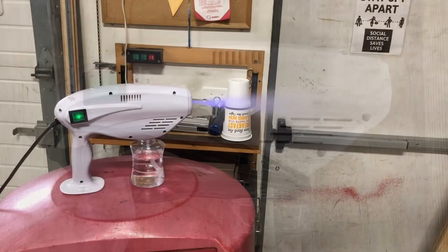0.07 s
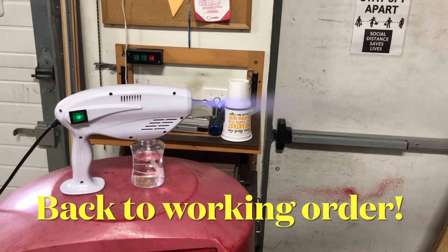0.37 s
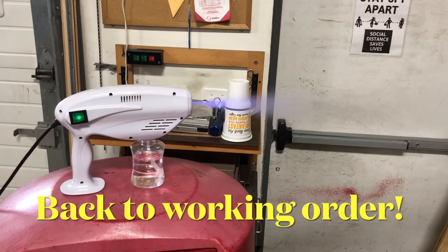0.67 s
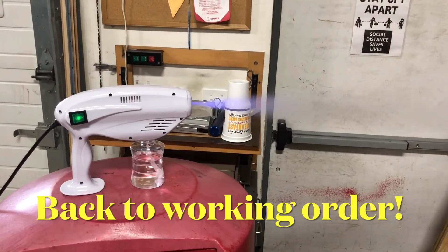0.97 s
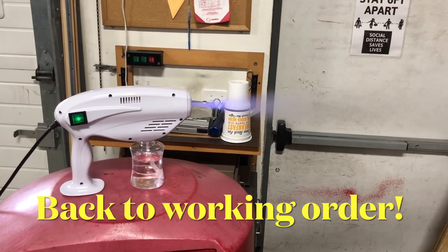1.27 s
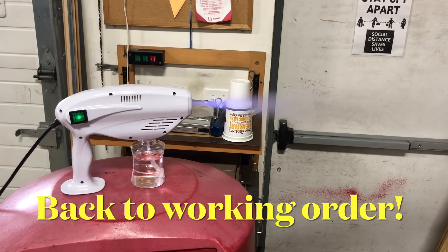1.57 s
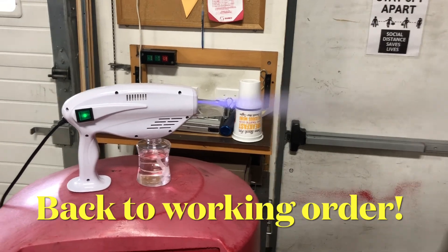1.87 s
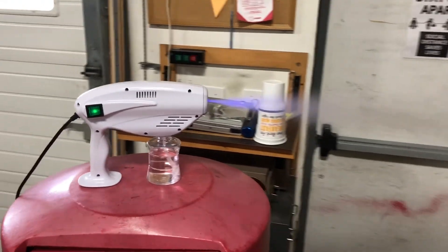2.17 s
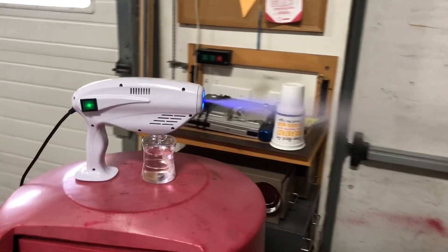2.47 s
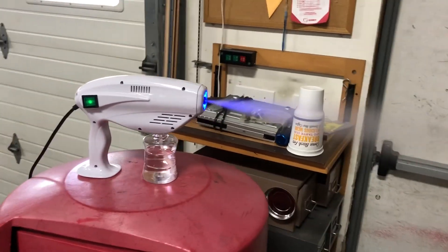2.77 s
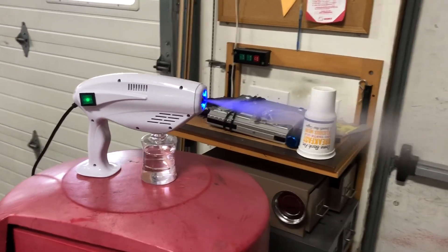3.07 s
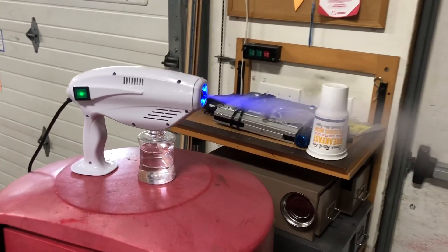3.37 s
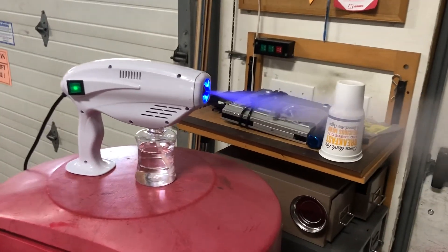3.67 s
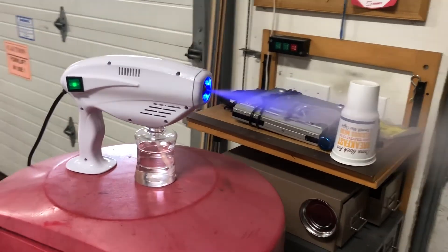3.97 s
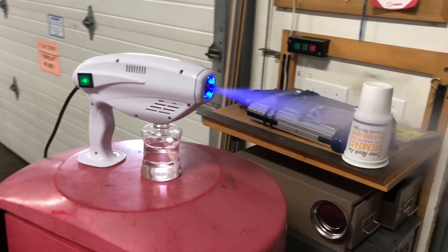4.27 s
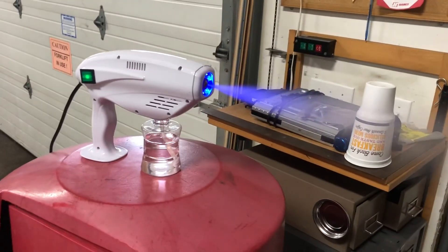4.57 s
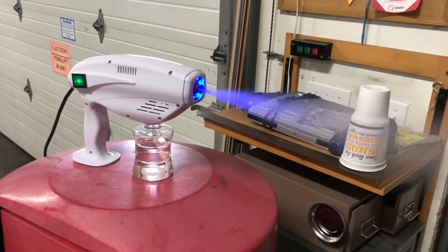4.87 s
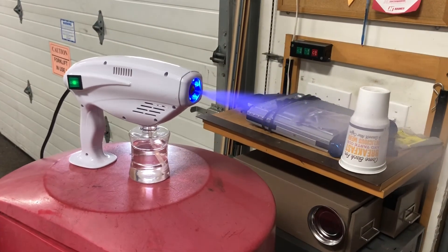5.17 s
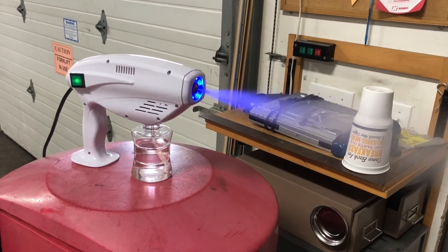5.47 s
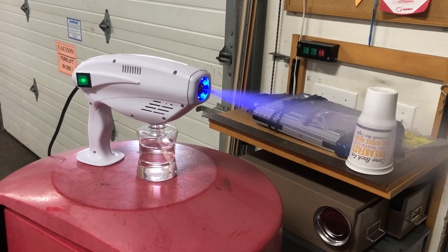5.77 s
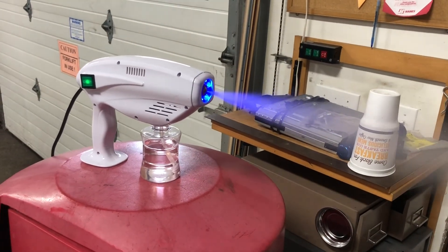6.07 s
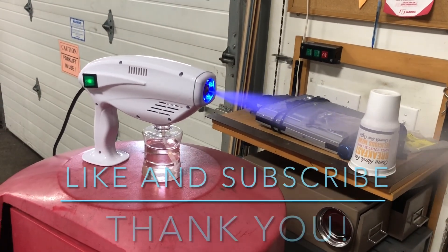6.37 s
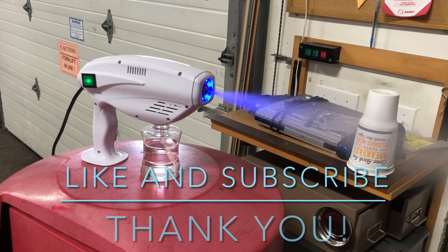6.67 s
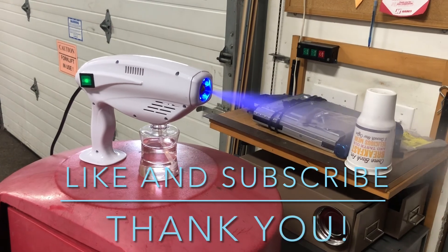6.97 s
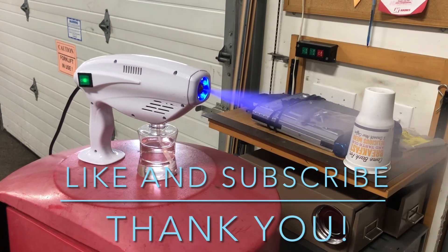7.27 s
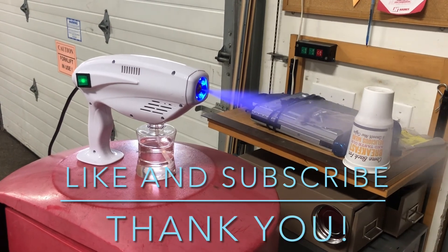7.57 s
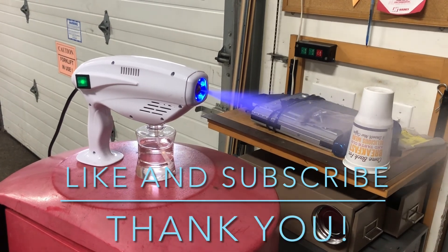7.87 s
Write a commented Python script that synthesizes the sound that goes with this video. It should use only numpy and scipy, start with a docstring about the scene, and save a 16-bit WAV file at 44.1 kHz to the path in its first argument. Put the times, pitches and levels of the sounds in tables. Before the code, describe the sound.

A steady, high, sizzling hiss comes from an electric mist sprayer, fluttering slightly as liquid tears unevenly off the nozzle. The pump hums faintly below it. Heard first from the side with light workshop reverberation, the spray turns brighter and drier as the microphone circles to the front. Late on, the nozzle spits briefly several times while the hiss carries on.

```python
"""A handheld electric fogger blows a steady jet of mist, standing on a plastic drum in a workshop.
Liquid tears unevenly off the nozzle, so the bright hiss sputters; the air pump hums faintly under it.
The microphone walks round toward the nozzle: the hiss brightens, its near reflections slide and the
room gets drier. Near 7 s a few larger slugs of liquid spit."""
import sys
import numpy as np
from scipy import signal
from scipy.fft import rfft, irfft, next_fast_len
from scipy.io import wavfile
from scipy.ndimage import map_coordinates

SR = 44100
rng = np.random.default_rng(int(sys.argv[2]) if len(sys.argv) > 2 else 0)


def master_out(mix):
    """Clip the mix to full scale and print it as 16-bit PCM to the path in sys.argv[1]."""
    frames = np.transpose(np.atleast_2d(mix))
    ceiling = np.clip(frames, -1, 1)
    pcm = np.round(ceiling * 32767).astype(np.int16)
    wavfile.write(sys.argv[1], SR, pcm)


N = 353461

# jet spectra, low to high register: (frequency [Hz], relative density at side [dB], at front [dB])
RUSH_SPECTRUM = [(25, -40, -40), (60, -17, -18), (105, -3.5, -11), (182, -5.5, -4), (250, -7.5, -9),
                 (320, -5, -4.5), (520, -5.5, -5), (686, -4, -3), (870, -5, -0.6), (1240, -3, -3.5),
                 (2000, -1, 0), (2760, 1.5, 3), (3450, -2.5, -16), (5000, -60, -60)]
HISS_SPECTRUM = [(1790, -50, -37.5), (2750, -23, -22), (2960, -8, -10), (3510, -4.5, -6), (4230, -2, -3.5),
                 (5730, -0.5, -0.5), (7300, -0.5, 0), (8500, 1, 0.5), (9740, 0.5, 2.5), (10870, -3.5, -24),
                 (13000, -62, -64)]
SIZZLE_SPECTRUM = [(8000, -50, -50), (9700, -16, -16), (10100, -9.5, -8.5), (11200, -7, -6.5),
                   (12200, -4, -2), (13000, -2, -1), (13800, 1, -.5), (15100, -.5, 0), (15800, -2, .5),
                   (17000, -40, -40)]
# jet beams: (relative level on axis [dB], axis position [0-1], loss one whole walk off axis [dB])
RUSH_BEAM = (-39, 0.27, 4.8)
HISS_BEAM = (-22.5, 0.68, 3.6)
SIZZLE_BEAM = (-14, 0.98, 2.65)
# hollow shell resonances, heard at the side: (centre [Hz], width [Hz], boost [dB])
SHELL_MODES = [(1180, 170, 3), (2970, 160, 3), (4180, 260, 2.5), (5680, 220, 4), (6280, 240, 3)]
# microphone path: (time [s], position [0 side, 1 front])
MIC_WALK = [(0, 0.048), (2, 0.04), (2.7, 0.44), (3.4, .57), (4.2, 0.92), (5, 0.94), (6, 0.95), (7, 0.95),
            (8, 0.92)]
# air pump tones: (multiple of stroke rate [-], nominal rms level at side [dB])
PUMP_TONES = [(3, -65.5), (15, -66), (20, -69), (23, -68), (24, -66.5), (25, -60.5), (27, -65), (28, -67)]
# nearest reflections: (delay at side [ms], at front [ms], relative level at side [dB], at front [dB])
NEAR_PATHS = [(.5, .59, -12, -8), (1.98, 1.73, -16, -20), (4.86, 4.45, -13, -19)]
# workshop decay: (frequency [Hz], T60 [s])
ROOM_T60 = [(100, 0.79), (2000, 0.57), (15000, 0.1)]
# slugs of liquid: (time [s], relative peak level [dB])
SPIT_EVENTS = [(6.8638, -22), (6.8902, -22), (6.9117, -21), (6.985, -22), (7.0506, -22), (7.111, -20.5)]

STROKE_HZ, TOP_HZ = 20, 15760
TIME_S = np.arange(N) / SR


def amp(db):
    """Decibels to gain."""
    return 10 ** (np.asarray(db) / 20)


def unit_rms(x):
    """x at rms 1."""
    return x / np.sqrt(np.mean(x ** 2) + 1e-20)


def log_interp(points, hz):
    """(frequency [Hz], value) points interpolated on a log axis."""
    knots_hz, values = np.transpose(points)
    return np.interp(np.log(hz + 1), np.log(knots_hz + 1), values)


def mic_position():
    """Position per sample: 0 side, 1 front."""
    return np.interp(TIME_S, *np.transpose(MIC_WALK))


def wobble(rate_hz):
    """Smooth random curve with knots at rate_hz."""
    knots = rng.standard_normal(int(N * rate_hz / SR) + 4)
    return map_coordinates(knots, [np.arange(N) * rate_hz / SR])


def filtered(x, response):
    """Zero-phase filter with gain response(hz)."""
    size = next_fast_len(N + SR // 2)
    return irfft(rfft(x, size) * response(np.fft.rfftfreq(size, 1 / SR)), size)[..., :N]


def drop_bursts(rate_hz, life_ms, scatter_db):
    """Drops burst at random in the air stream: power envelope, mean 1."""
    count = int(rate_hz * N / SR)
    onsets = rng.integers(0, N, count)
    impulses = np.bincount(onsets, amp(scatter_db * rng.standard_normal(count)) ** 2, N)
    power = signal.lfilter([1], [1, -np.exp(-1000 / (life_ms * SR))], impulses)
    return power / power.mean()


def shell_db(hz):
    """Boost from the fogger's hollow shell."""
    return sum(db / (1 + (2 * (hz - centre_hz) / width_hz) ** 2)
               for centre_hz, width_hz, db in SHELL_MODES)


def spray(spectrum, feed, bursts, sputter_db, burst_share):
    """Turbulence swells with the feed and crackles with drops; its colour follows the walk."""
    envelope = amp(sputter_db * feed) * np.sqrt(1 - burst_share + burst_share * bursts)
    noise = envelope * rng.standard_normal(N)
    spectrum = np.array(spectrum)
    side = unit_rms(filtered(noise, lambda hz: amp(log_interp(spectrum[:, [0, 1]], hz) + shell_db(hz))))
    front = unit_rms(filtered(noise, lambda hz: amp(log_interp(spectrum[:, [0, 2]], hz))))
    return side + mic_position() * (front - side)


def beam(axis_db, axis_position, loss_db):
    """Gain of one broad beam as the microphone walks through it."""
    return amp(axis_db - loss_db * (mic_position() - axis_position) ** 2)


def swell(attack_s=0.32, attack_db=3, settle_s=2.6, settle_db=0.9):
    """Jet gain: quick rise, slow creep to 1, hold."""
    attack_left = np.maximum(1 - TIME_S / attack_s, 0)
    settle_left = np.maximum(1 - TIME_S / settle_s, 0)
    return amp(-attack_db * attack_left - settle_db * settle_left)


def nozzle():
    """One uneven thread of liquid drives all three registers of the jet."""
    feed = unit_rms(0.14 * wobble(22) + 0.69 * wobble(110) + 0.77 * wobble(480))
    feed = feed - 0.15 * feed ** 2  # starves more deeply than it surges
    bursts = drop_bursts(rate_hz=1400, life_ms=0.3, scatter_db=4)
    rush = beam(*RUSH_BEAM) * spray(RUSH_SPECTRUM, feed, bursts, sputter_db=2.3, burst_share=0.43)
    hiss = beam(*HISS_BEAM) * spray(HISS_SPECTRUM, feed, bursts, sputter_db=1.26, burst_share=0.23)
    sizzle = beam(*SIZZLE_BEAM) * spray(SIZZLE_SPECTRUM, feed, bursts, sputter_db=1.08, burst_share=0.071)
    return swell() * (rush + hiss + sizzle)


def pump(waver_db=2.0, drift_rad=0.42, front_db=-2, shade_db=-5):
    """Wavering pump tones leak from the side vents; toward the front the higher ones fade most."""
    position, hum = mic_position(), 0
    for order, db in PUMP_TONES:
        facing_db = position * (front_db + shade_db * order / PUMP_TONES[-1][0])
        level_db = db + waver_db * wobble(3) + facing_db
        phase_rad = 2 * np.pi * (order * STROKE_HZ * TIME_S + rng.random()) + drift_rad * wobble(1.95)
        hum += amp(level_db) * np.sqrt(2) * np.sin(phase_rad)
    return hum


def echoes(x, paths, position, oversample=8):
    """Delayed copies whose lag and gain slide with position: (sum, summed power gain)."""
    fine = signal.resample_poly(x, oversample, 1)
    copies, power = 0, 0
    for side_ms, front_ms, side_db, front_db in paths:
        lag_samples = (side_ms + (front_ms - side_ms) * position) * SR / 1000
        gain = amp(side_db + (front_db - side_db) * position)
        index = np.rint((np.arange(N) - lag_samples) * oversample).astype(int)
        copies += gain * fine.take(index, mode="wrap")
        power += gain ** 2
    return copies, power


def reflections(jet, side_db=-20, front_db=-27, dull_hz=9000, slide_ms=0.5, reach_ms=7, count=18):
    """Direct jet combed by drum, shelf and door; the notches sweep as the microphone moves."""
    position = mic_position()
    position += (0.004 + 0.025 * position) * wobble(2.5)  # unsteady hand
    # the highest hiss beams forward and misses the nearest surfaces
    dulled = filtered(jet, lambda hz: 1 / np.sqrt(1 + (hz / dull_hz) ** 6))
    near, _ = echoes(dulled, NEAR_PATHS, position)
    clutter_paths = []
    for distance, slide in rng.random((count, 2)):
        side_ms = 1 + reach_ms * distance
        clutter_paths.append((side_ms, side_ms + slide_ms * (2 * slide - 1), side_db, front_db))
    clutter, power = echoes(jet, clutter_paths, position)
    return (jet + near + clutter) / np.sqrt(1 + power)


def room_response():
    """Diffuse impulse response, energy 1; treble dies first."""
    hz, time_s, noise = signal.stft(rng.standard_normal(SR // 3), SR, nperseg=256)
    decay = amp(-60 * time_s / log_interp(ROOM_T60, hz)[:, None])
    _, tail = signal.istft(noise * decay, SR, nperseg=256)
    return np.pad(tail / np.linalg.norm(tail), (SR // 128, 0))


def workshop(jet, hop_samples=16384):
    """Reverberation; each spot along the walk has its own response."""
    padded, wet = np.pad(jet, hop_samples), np.zeros(N + 3 * hop_samples + SR)
    window = np.sqrt(np.hanning(2 * hop_samples))
    for start in range(0, N + hop_samples, hop_samples):
        piece = padded[start:start + 2 * hop_samples]
        reverb = signal.fftconvolve(piece * window[:len(piece)], room_response())
        wet[start:start + len(reverb)] += reverb
    return wet[hop_samples:hop_samples + N]


def spits(gain_db=-4.0, rise_ms=2.2, centre_hz=3800, width_oct=0.38):
    """Larger slugs of liquid tear off, each a short, lower spit."""
    envelope = np.zeros(N)
    for onset_s, db in SPIT_EVENTS:
        age = np.maximum(TIME_S - onset_s, 0) * 1000 / rise_ms
        envelope += amp(db + gain_db) * age * np.exp(1 - age)
    band = lambda hz: np.exp(-0.5 * (np.log2((hz + 1) / centre_hz) / width_oct) ** 2)
    return envelope * unit_rms(filtered(rng.standard_normal(N), band))


def scene():
    """Jet, reflections, room and pump at one microphone; both channels equal."""
    jet = nozzle() + spits()
    room = amp(-5.5 - 3.9 * mic_position()) * workshop(jet)  # drier at the front
    mono = amp(-1.06) * (reflections(jet) + room) + pump()
    return np.array([mono, mono])


def record(dry, ceiling=0.73):
    """Soft peak limit, then a sharp low-pass."""
    rounded = dry / (1 + np.abs(dry / ceiling) ** 8) ** (1 / 8)
    return filtered(rounded, lambda hz: hz < TOP_HZ)


dry = scene()
out = record(dry)
master_out(out)
```